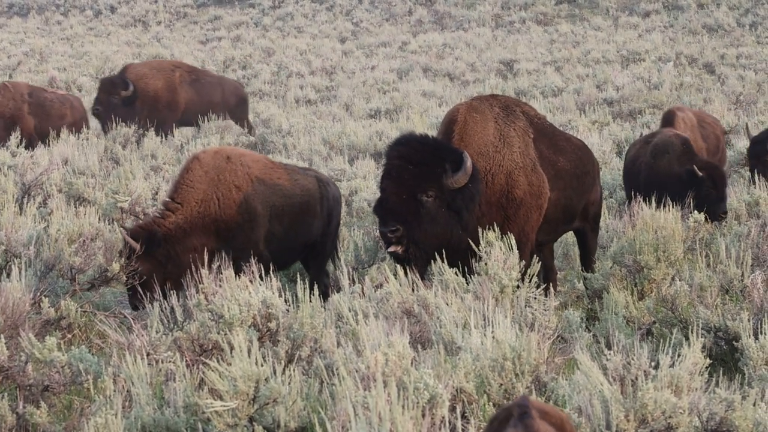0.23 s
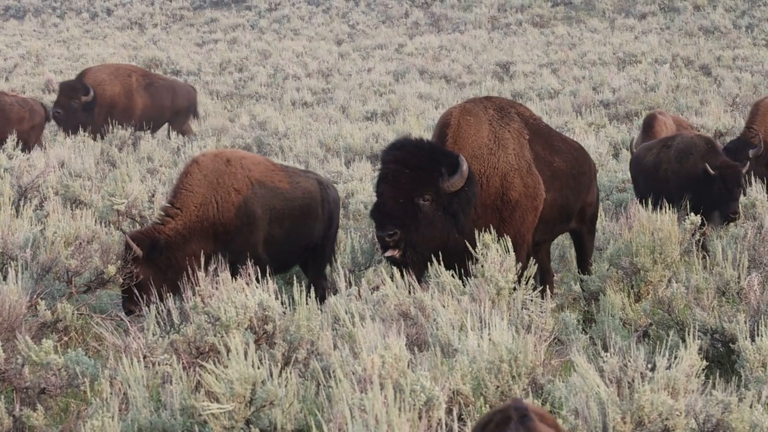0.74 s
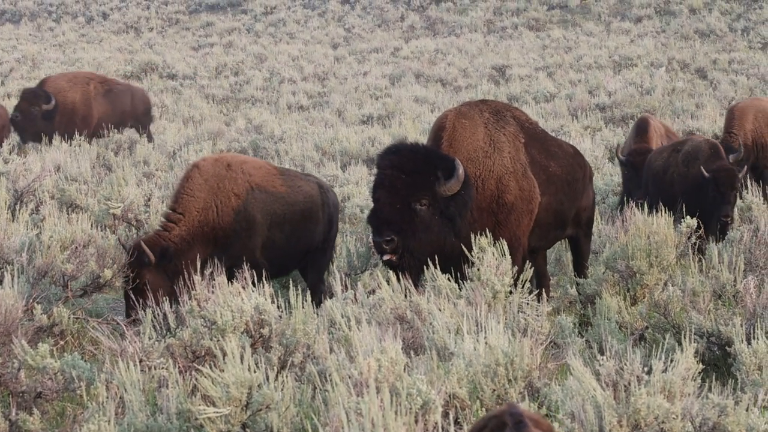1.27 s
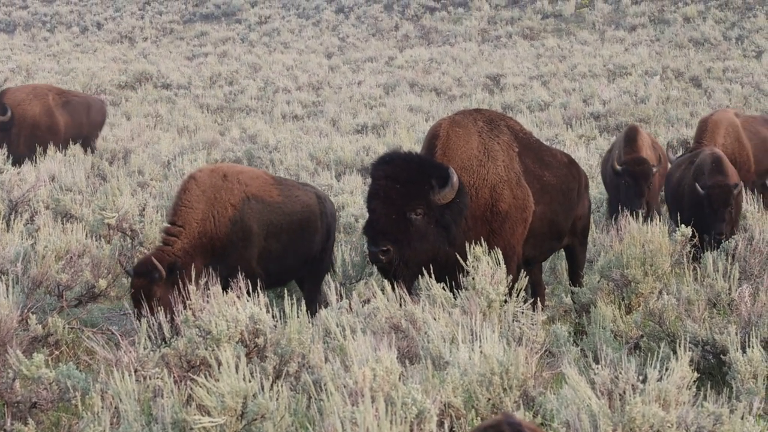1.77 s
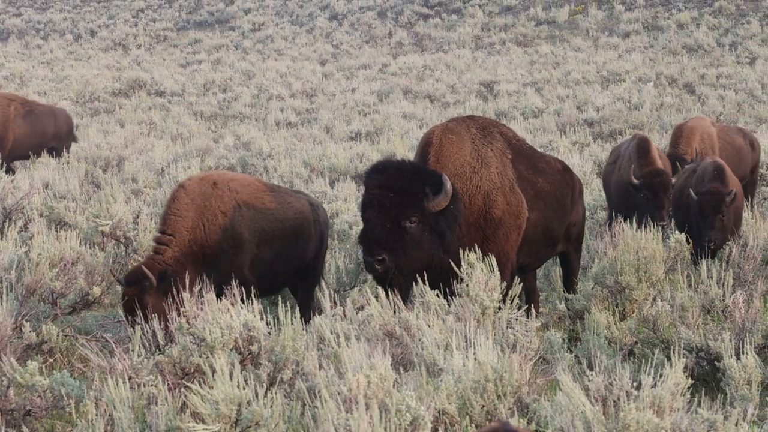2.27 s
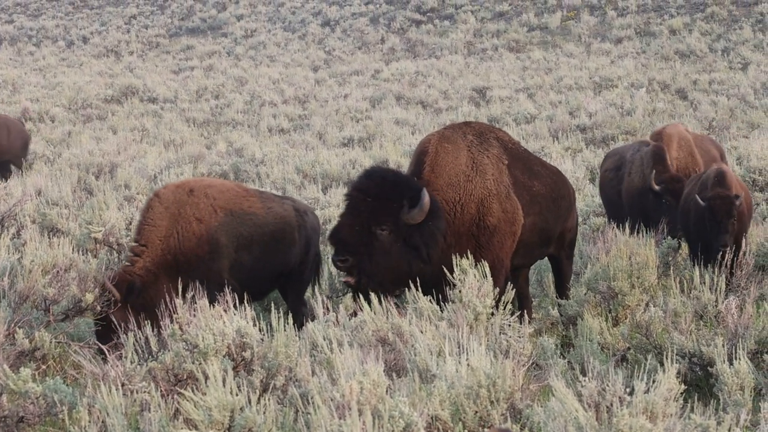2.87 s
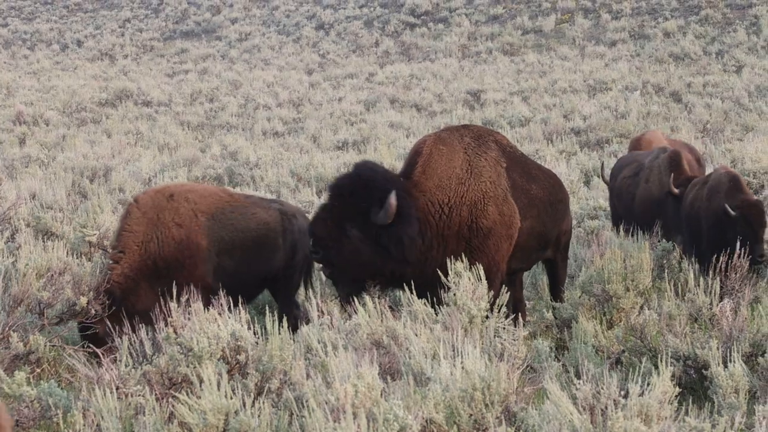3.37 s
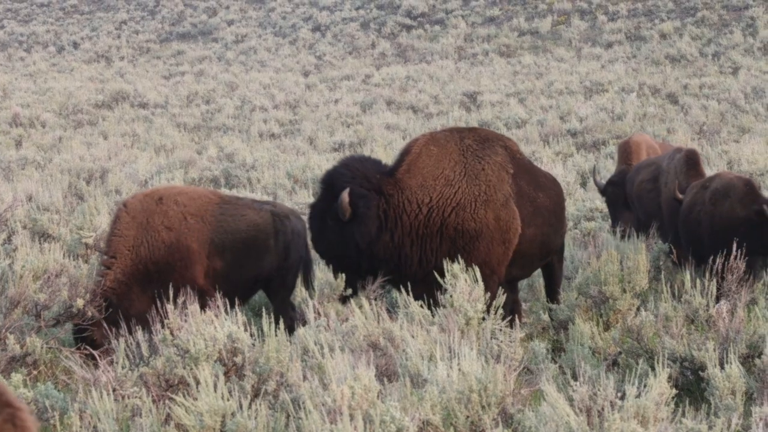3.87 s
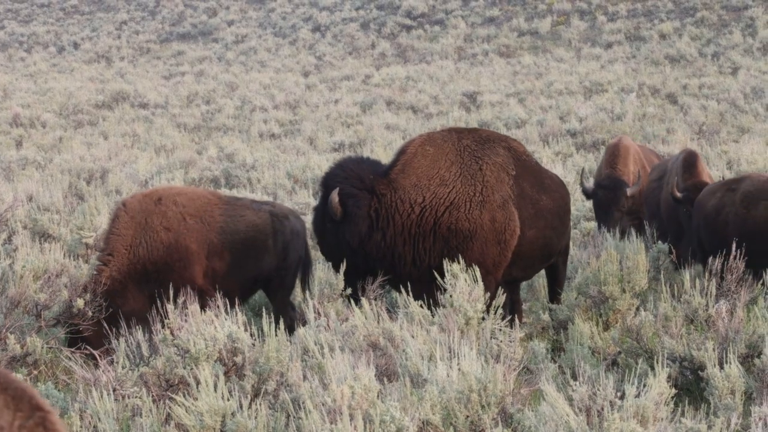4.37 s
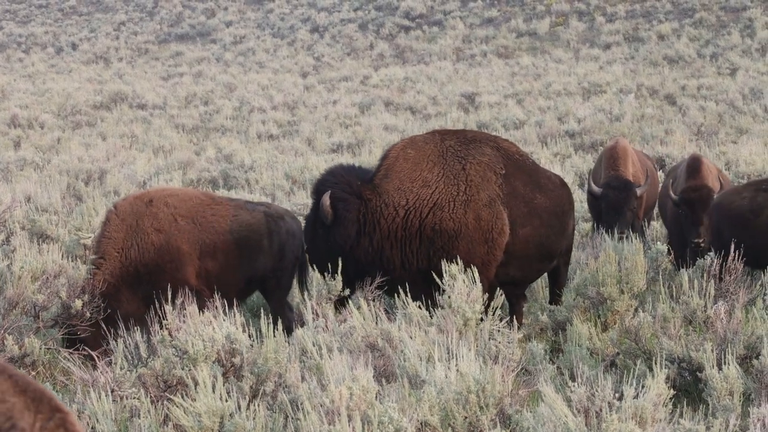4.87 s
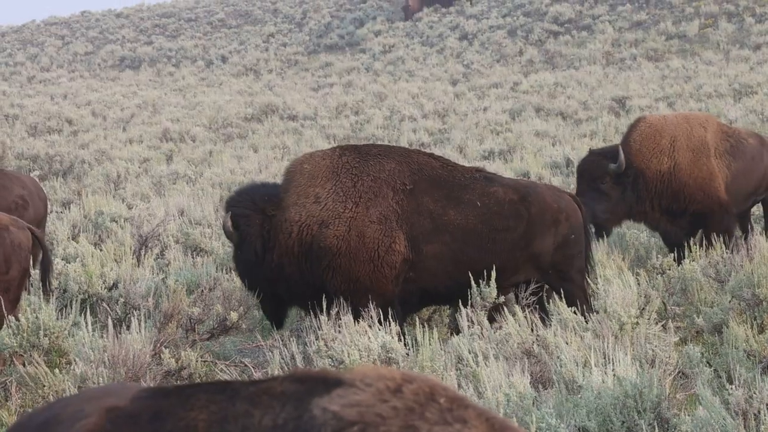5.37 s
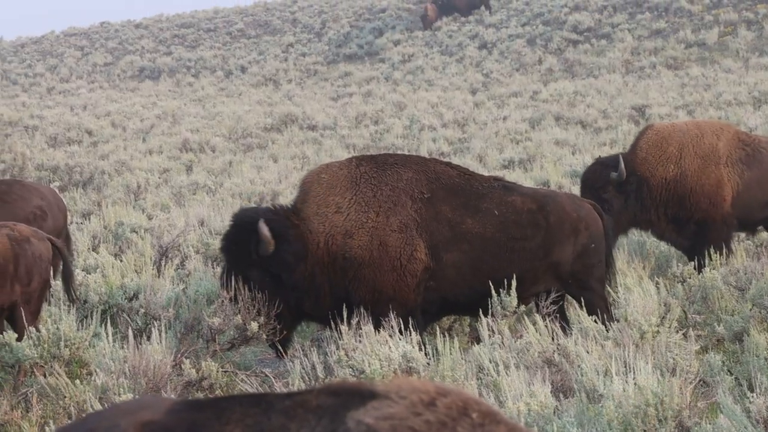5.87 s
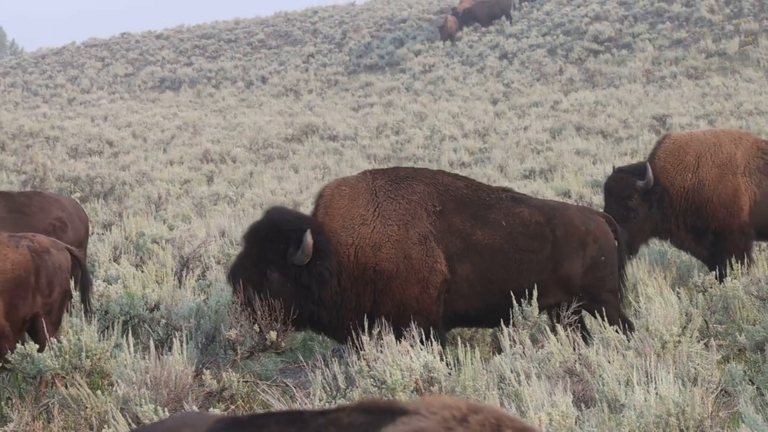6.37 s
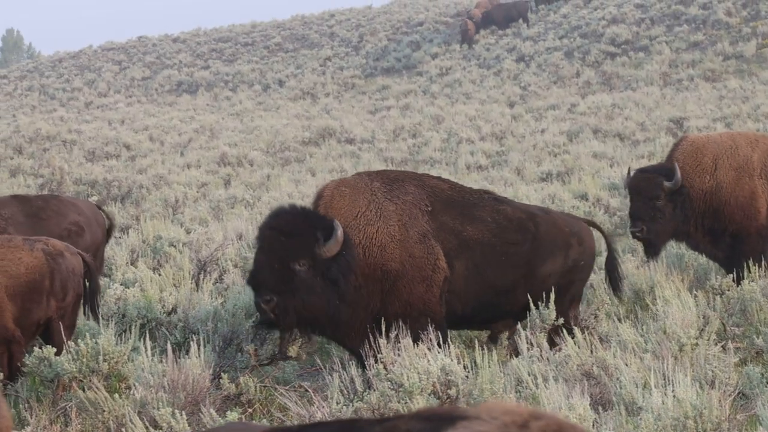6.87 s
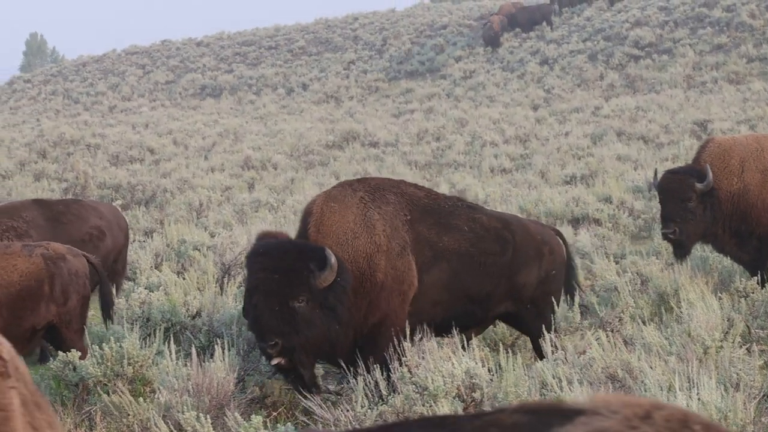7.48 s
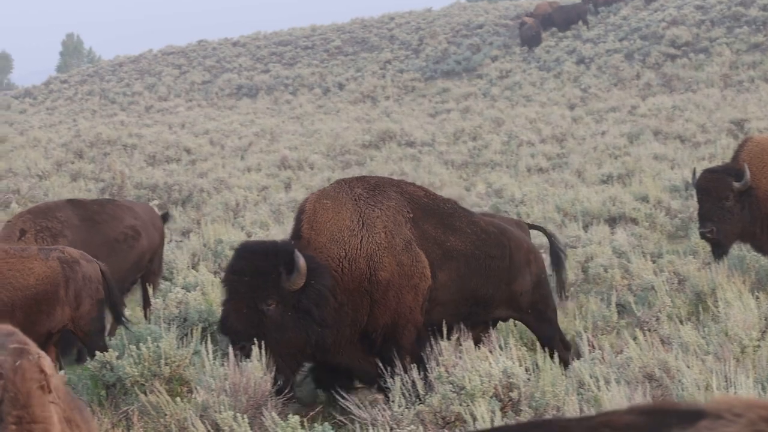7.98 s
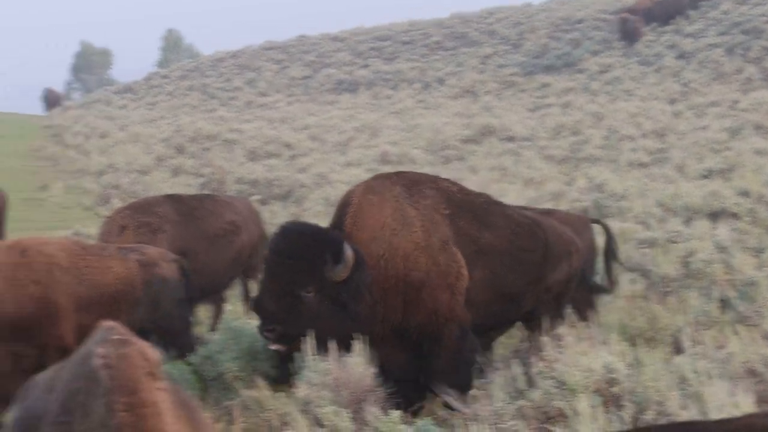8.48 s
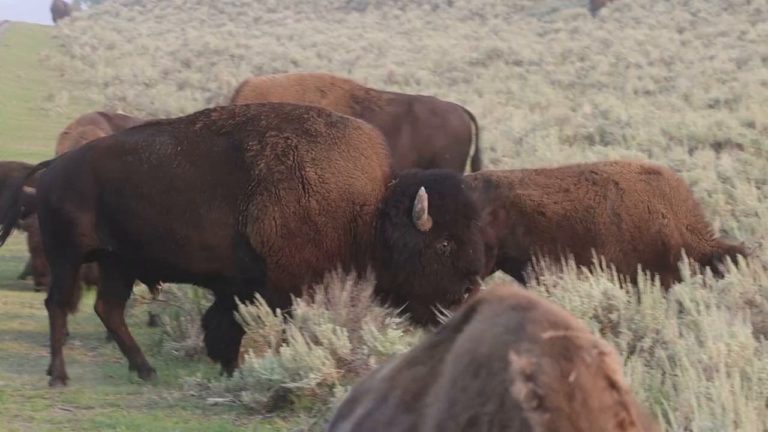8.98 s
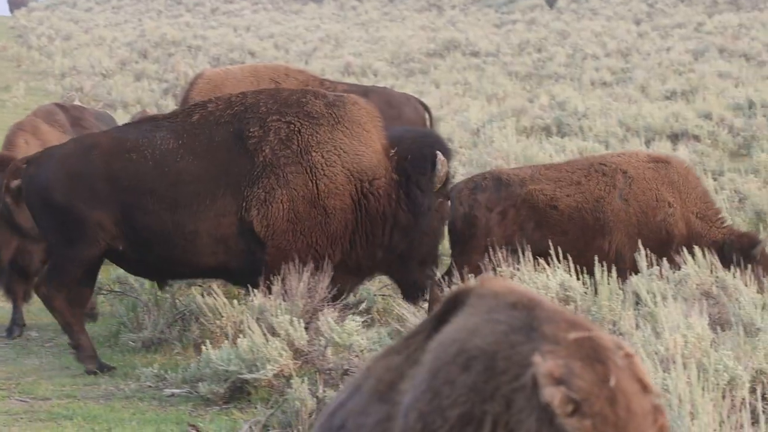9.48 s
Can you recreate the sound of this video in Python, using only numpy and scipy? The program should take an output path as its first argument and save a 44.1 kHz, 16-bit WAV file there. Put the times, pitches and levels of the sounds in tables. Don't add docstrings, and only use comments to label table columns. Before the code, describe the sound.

Bison bulls call in turn: a guttural near growl, a sparse clicking pause, a held deep moan, overlapping grunts and rattles, a raspy croaking grunt, a brief distant hoot, then a powerful sustained rumbling roar ending in snorts and a short grunt. Dry twigs crack and brush rustles lightly. Open-air sound with a slight short scatter off the slope, quiet low wind, and a slightly dull top end.

```python
import sys
import numpy as np
from scipy import signal
from scipy.io import wavfile
from scipy.ndimage import uniform_filter1d

SR = 44100
rng = np.random.default_rng(int(sys.argv[2]) if len(sys.argv) > 2 else 0)


def wav_record(signal):
    frames = np.transpose(np.atleast_2d(signal))
    bounded = np.clip(frames, -1, 1)
    quanta = np.round(bounded * 32767).astype(np.int16)
    wavfile.write(sys.argv[1], SR, quanta)


def volts_from_db(level):
    exponent = np.asarray(level, float) / 20
    return 10 ** exponent


N = 428652


def evened(x, span_s=0):
    power = uniform_filter1d(x ** 2, round(span_s * SR)) if span_s else np.mean(x ** 2)
    return x / np.sqrt(abs(power) + 1e-14)


def smooth_twice(x, size):
    return uniform_filter1d(uniform_filter1d(x, size=size), size=size)


def drift(n, per_s):
    return evened(smooth_twice(rng.standard_normal(n), round(SR / per_s)))


def beats(rate_hz, jitter):
    wander = evened(smooth_twice(rng.standard_normal(len(rate_hz)), 400))
    return np.cumsum(rate_hz * np.exp(jitter * wander)) / SR


def add(mix, start_s, sound):
    part = mix[round(start_s * SR):][:len(sound)]
    part += sound[:len(part)]


def peaked(x):
    return x / abs(x).max()


def resonate(x, hz, width_hz):
    turn = np.exp(2j * np.pi * np.cumsum(hz * np.ones(len(x))) / SR)
    r = np.exp(-np.pi * width_hz / SR)
    return 2 * (turn * signal.lfilter([1 - r], [1, -r], x / turn)).real


def resonate_twice(x, hz, first_width_hz, second_width_hz):
    return resonate(resonate(x, hz, first_width_hz), hz, second_width_hz)


def tract(x, modes, opening):
    out = 0
    for k, (hz, width_hz, level_db) in enumerate(modes):
        out = out + (-1) ** k * volts_from_db(level_db) * resonate(x, hz * opening, width_hz)
    return out


def band_air(hz, width_hz, length_s):
    air = resonate_twice(rng.standard_normal(round(length_s * SR)), hz, width_hz, 2 * width_hz)
    return evened(air) * signal.windows.tukey(len(air), .6)


def coloured(colour, patch_db, flicker_db, size):
    frames, hz = 4 * N // size + 5, np.fft.rfftfreq(size, 1 / SR)
    a, b, patches = rng.standard_normal((frames, len(hz), 3)).T
    patches = evened(uniform_filter1d(uniform_filter1d(patches, size=9, axis=0), size=9, axis=1))
    flicker = evened(uniform_filter1d(rng.standard_normal(frames), size=3))
    colour_hz, colour_db = np.transpose(colour)
    level_db = np.interp(np.log(hz + 1), np.log(colour_hz + 1), colour_db)
    z = (a + 1j * b) * volts_from_db(level_db[:, None] + patch_db * patches + flicker_db * flicker)
    return evened(signal.istft(z, nperseg=size, noverlap=size * 3 // 4)[1][:N])


# pitch_hz, density_db
WASH = [(15, -39.5), (25, -21), (166, 1), (236, -2), (270, -4.5), (384, -2.5), (476, -6.5), (754, -8.5),
        (1520, -13.5), (1740, -17), (2910, -23.5), (3160, -25), (16000, -49.5)]


def wash():
    return volts_from_db(-38) * coloured(WASH, patch_db=1.58, flicker_db=1.26, size=1024)


# pitch_hz, level_db
BRUSH_COLOUR = [(2500, -25), (4500, -8), (7000, -3), (10000, -1), (15500, 0), (16500, -30)]
# centre_s, length_s, level_db
STROKES = [(0.107, 0.056, -62), (0.813, 0.027, -58), (2.787, 0.061, -60), (4.327, 0.027, -63),
           (4.9, 0.018, -56), (5.85, 0.069, -62), (6.51, .12, -58.5), (7.214, .05, -61), (7.66, 0.023, -55),
           (8.547, .03, -54), (8.635, 0.036, -61.5), (8.905, 0.054, -59), (9.316, 0.048, -55.5),
           (9.493, 0.026, -51), (9.676, 0.079, -54)]


def brush(herd):
    rustle_db, breath_db, cracks_per_s = -80, -54, 300
    cracks = volts_from_db(2.1 * np.minimum(rng.exponential(1, N), 4)) * (rng.random(N) < cracks_per_s / SR)
    stem_modes = [(4000, 3000, -50), (8300, 4000, 35), (13000, 5500, -27.5)]  # pitch_hz, width_hz, level_db
    cracks = tract(cracks * rng.choice([-1, 1], N), stem_modes, 0.62)
    hiss = coloured(BRUSH_COLOUR, patch_db=1.5, flicker_db=4, size=1024) + .15 * evened(cracks)
    t = np.arange(N) / SR
    strokes = sum(volts_from_db(db) * np.exp(-((t - s) / length_s) ** 2) for s, length_s, db in STROKES)
    breath = volts_from_db(breath_db) * abs(uniform_filter1d(herd ** 2, size=SR // 5)) ** .25
    stirring = np.sqrt(volts_from_db(rustle_db) ** 2 + strokes ** 2)
    return stirring * hiss + breath * resonate(np.roll(hiss, SR), 5500, 5000)


# start_s, peak_db, low_over_peak_db
SNAPS = [(0.078, -37, 7), (0.811, -26, -1), (1.0077, -48, 16), (1.136, -40, 7), (1.181, -41, 8),
         (1.21, -43, 5), (1.321, -43, -3), (1.475, -27, -19), (1.595, -54, 0), (1.744, -39, 7),
         (1.793, -44, 6), (2.024, -56, 4), (2.187, -54, -1), (2.224, -48, 1), (3.36, -42, 6),
         (2.282, -19, -29), (3.6067, -31, -25), (4.341, -30.5, 4), (4.8932, -39, 15.5), (5.705, -49.5, 17),
         (5.8816, -28, -24), (5.929, -30, -21), (5.9798, -37, -10), (6.465, -30, -6), (7.215, -38, 0),
         (7.643, -32.5, 8), (8.547, -29.5, 2), (8.7162, -66, 10), (8.8373, -52, 1), (8.9531, -35, 0),
         (9.2748, -36, 3), (9.412, -42, 12), (9.46, -38, 12), (9.4696, -32, 21), (9.532, -40, 12)]


def snaps():
    lead_s = .01
    out, t = np.zeros(N), np.arange(2600) / SR - lead_s
    for s, db, low_db in SNAPS:
        envelope = (t > 0) * volts_from_db(-60 * t / 0.0044) + 0.06 * np.exp(-(t / 0.008) ** 2)
        burst = rng.standard_normal(len(t)) * envelope
        high, low = np.diff(burst, prepend=0), resonate(burst, 3500, 2000)
        add(out, s - lead_s, volts_from_db(db) * (0.6 * peaked(high) + volts_from_db(low_db - 0.5) * peaked(low)))
    return out


def slope_echo(herd):
    t = np.arange(SR // 4) / SR
    hits = rng.choice([-1, 1], len(t)) * (rng.random(len(t)) < 1500 / SR)
    slope = hits * volts_from_db(-60 * t / .25) * (t > .004)
    return volts_from_db(-13) * signal.oaconvolve(herd, slope / np.linalg.norm(slope))[:N]


# start_s, length_s, level_db, centre_hz, width_hz
PUFFS = [(1.177, 0.029, -30, 1540, 349.4), (1.207, 0.044, -33.5, 1170, 501), (1.237, 0.028, -44, 950, 350),
         (1.319, 0.0065, -35, 1980, 1500), (1.79, 0.0066, -47, 2900, 900), (3.48, 0.011, -40, 2750, 900),
         (3.547, 0.0096, -41.5, 2600, 1200), (5.701, 0.012, -43, 2180, 1200), (4.52, 0.033, -38, 1400, 700),
         (4.89, 0.0065, -33.5, 2820, 1560), (7.127, 0.091, -49.5, 5200, 1210), (7.22, .03, -48, 4200, 600),
         (7.552, .3, -58, 4850, 900), (8.248, .13, -53, 2980, 900), (2.018, 0.014, -54, 2950, 700),
         (9.464, .03, -43, 5370, 500), (9.471, 0.026, -44, 3500, 500), (3.441, 0.042, -46.5, 3240, 1500),
         (3.52, 0.013, -41.5, 2380, 1500), (3.831, .25, -50, 2100, 300), (8.7, .2, -40, 320, 60),
         (9.034, 0.065, -41, 1460, 1510), (9.454, 0.0069, -30, 863, 900), (9.471, 0.01, -24.5, 630, 600),
         (9.481, 0.027, -34, 1200, 1200), (9.609, 0.032, -42, 2650, 504)]


def puffs():
    out = np.zeros(N)
    for s, length_s, db, hz, width_hz in PUFFS:
        add(out, s, volts_from_db(db) * band_air(hz, width_hz, length_s))
    return out


# start_s, length_s, level_db, first_hz, last_hz, width_hz
SWEEPS = [
    (1.175, 0.088, -39, 1730, 880, 230),
    (2.62, 0.07, -30, 660, 1550, 230),
    (1.18, 0.053, -47, 3800, 2300, 1000),
]


def sweeps():
    out = np.zeros(N)
    for s, length_s, db, first_hz, last_hz, width_hz in SWEEPS:
        hz = np.linspace(first_hz, last_hz, round(length_s * SR))
        add(out, s, volts_from_db(db) * band_air(hz, width_hz, length_s))
    return out


# start_s, peak_db, mouth_hz
CLICKS = [(1.615, -32, 991), (1.647, -27, 1450), (1.667, -24, 1400), (1.7046, -24.5, 1150),
          (1.717, -24, 1450), (1.7529, -22.5, 1470), (1.778, -28, 1490), (1.7963, -23.5, 1270),
          (1.815, -28, 1010), (1.8506, -21.5, 1340), (2.0243, -36, 953), (3.7248, -22, 930),
          (3.765, -23.5, 950), (3.8024, -25, 970), (3.8514, -25, 982), (9.47, -28, 1490),
          (3.484, -25, 1400), (3.677, -30, 1010), (3.745, -22, 900), (3.785, -25, 940), (4.985, -21.5, 900),
          (5.074, -20, 980), (5.165, -30, 2200), (5.19, -21, 2160), (5.216, -27, 2200), (5.245, -23, 2100),
          (5.33, -28, 2270), (5.026, -25, 902), (5.0495, -22, 945), (5.1472, -22, 1310),
          (5.1924, -24, 1220), (5.2778, -23, 1210), (5.39, -32, 1320), (5.5704, -39, 1375),
          (6.2806, -22, 980), (6.396, -26, 1280)]


def clicks():
    out, click = np.zeros(N), signal.unit_impulse(2000)
    knock = peaked(resonate(click, 285, 70))
    for s, db, hz in CLICKS:
        ring = resonate(click, hz, 185) - 0.19 * resonate(click, 1.22 * hz, 880)
        add(out, s, volts_from_db(db) * (peaked(ring) + 0.23 * knock))
    return out


# time_s, pitch_factor
JAW = [(0, 1), (2.3, 1), (2.55, .86), (2.72, 1.02), (2.95, 1), (7.66, 0.99), (7.8, 1.12), (8.05, 1.08),
       (8.2, 1.02), (8.55, 1.05), (8.7, 1.03), (8.9, 0.99)]


def jaw_factor(t):
    return np.interp(t, *np.transpose(JAW))


# start_s, peak_db
SLAPS = [(0.031, -14.5), (0.054, -16), (0.077, -17), (0.1, -16), (0.124, -18), (0.161, -13), (0.272, -16),
         (0.384, -20), (0.406, -17), (0.453, -16.5), (0.476, -11.5), (0.55, -18), (0.573, -14),
         (0.668, -16), (0.692, -14), (0.714, -17), (0.753, -18), (0.83, -15), (0.881, -12.5), (0.925, -15),
         (0.97, -11.5), (0.995, -9.5), (1.018, -12), (1.106, -12.5), (1.881, -14.5), (1.926, -21.5),
         (2.634, -16), (3.523, -12.5), (3.544, -13), (3.568, -20), (3.611, -17), (3.628, -14), (7.127, -21),
         (7.184, -13.5), (7.219, -7), (7.539, -15), (7.605, -15), (7.628, -19), (7.652, -18), (7.674, -19),
         (7.722, -16), (7.747, -15), (7.769, -19), (7.796, -15), (7.82, -14), (7.845, -16.5), (7.87, -11.5),
         (7.924, -12), (7.944, -19), (7.968, -11), (7.994, -16), (8.017, -17), (8.041, -17), (8.165, -18),
         (8.275, -15), (8.33, -17), (8.638, -11), (8.809, -15)]
# pitch_hz, width_hz, level_db
NEAR_MOUTH = [(475, 14, -1), (650, 28, 0), (955, 60, -2), (1215, 65, -3), (1510, 135, -9.5)]


def slaps():
    out, click = np.zeros(N), signal.unit_impulse(2500)
    knock = peaked(resonate_twice(click, 215, 60, 120))
    damped = [(hz, 1.6 * width_hz, db) for hz, width_hz, db in NEAR_MOUTH]
    for s, db in SLAPS:
        lift = jaw_factor(s) * rng.uniform(.98, 1.03)
        ring = resonate(tract(click, damped, lift), 1150, 1300)
        add(out, s, volts_from_db(min(db, -8) - 1) * (peaked(ring) + .3 * knock))
    return out


FOLDS = {"growl": (2.5, .33, 6, .48), "rattle": (6.5, .2, 0, 0), "moan": (2, .4, 2.5, .76),
         "held": (1, .24, 5, .88), "grunt": (3.4, .4, 0, .05), "rasp": (5.2, .72, 0, .1),
         "hoot": (2.6, .4, 0, .7), "roar": (2.5, .48, 5, .6), "torn": (2.5, .46, 5, .42),
         "hum": (3, .5, 2, .68)}
# start_s, way, rasp_db
CHANGES = [(0, "growl", 1.5), (.9, "growl", 5), (1.4, "rattle", -12), (2.3, "moan", -6),
           (2.96, "held", 0.5), (3.42, "torn", 3.5), (3.75, "grunt", 11), (4.48, "moan", 14),
           (4.85, "rasp", 14), (6, "hoot", 7), (7, "roar", 0), (7.38, "torn", 2), (7.6, "torn", 3.5),
           (7.9, "torn", 0.5), (8.07, "hum", 5.5), (8.87, "rattle", 6.5), (9.3, "growl", 11.5)]


def folds(t):
    glide_s = .03
    ways = np.array([(*FOLDS[way], rasp_db) for _, way, rasp_db in CHANGES])
    now = np.searchsorted([s for s, *_ in CHANGES], t, side="right") - 1
    return uniform_filter1d(ways[now], size=round(glide_s * SR), axis=0, mode="nearest").T


# time_s, pitch_hz
TONGUE = [(0, 673), (.22, 656), (.3, 742), (.55, 736), (.75, 627), (1.05, 660), (1.16, 750), (3.4, 620),
          (3.72, 740), (7.1, 710), (7.35, 697), (7.45, 600), (7.6, 600), (7.8, 657), (8.1, 630), (8.2, 677),
          (8.55, 678), (8.66, 617), (8.8, 684.6)]
# lowest_hz, highest_hz
TONGUE_RANGE = (620, 670)


def moving_mouth(modes, t):
    wobble_share, flutter_db, jaw_above_hz = .01, 1.5, 800
    tongue_hz, jaw = np.interp(t, *np.transpose(TONGUE)), jaw_factor(t)
    moved = []
    for hz, width_hz, db in modes:
        if TONGUE_RANGE[0] < hz < TONGUE_RANGE[1]:
            pitch_hz = tongue_hz
        else:
            pitch_hz = hz * (jaw if hz > jaw_above_hz else 1) * (1 + wobble_share * drift(len(t), 8.1))
        moved.append((pitch_hz, width_hz, db + flutter_db * drift(len(t), 25)))
    return moved


def bellow(rows, mouth, rasp, chest_width_hz, growl_db, growl_hz):
    s, *columns = np.transpose(rows)
    t = np.arange(s[0], s[-1], 1 / SR)
    chest_db, chest_hz, mouth_db = (np.interp(t, s, c) for c in columns)
    cycles, rough, weak_db, sung, rasp_db = folds(t)
    turns = beats(chest_hz / cycles, .3 * rough ** 2)
    beat = turns.astype(int)
    size = volts_from_db(2.8 * rough * rng.standard_normal(400)[beat] - weak_db * (beat % 2))
    pulses = size * (np.diff(beat, prepend=0) > 0)
    air_puffs = evened(size * (.25 + np.exp(-(turns % 1) / .35)) * rng.standard_normal(len(t)))
    drive = evened(pulses) + air_puffs * 1.3 * rough

    tone = evened(resonate_twice(drive, chest_hz, chest_width_hz, 60), .06)
    tone = (1 - sung) * tone + sung * 1.6 * np.sin(2 * np.pi * beats(chest_hz, .04 * rough))

    flap = np.diff(beats(44 + 0 * t, .18).astype(int), prepend=0) > 0
    flaps = evened(flap * rng.uniform(.5, 1, len(t)))
    growl = evened(resonate_twice(flaps + .5 * drive, growl_hz, 60, 150), .1)
    rumble = evened(resonate_twice(flaps + drive, 118.4, 30, 35), 0.21)
    growl = growl + volts_from_db(-27 - growl_db) * rumble

    upper = resonate(tract(drive + .6 * rough * flaps, moving_mouth(mouth, t), 1), 1053, 960)
    patchy = [(hz, .6 * width_hz, db + 1.8 * drift(len(t), 12)) for hz, width_hz, db in rasp]
    air = resonate(tract(.5 * drive + air_puffs, patchy, 1), 3500, 7000)
    upper = evened(upper, 0.074) + evened(air, 0.39) * volts_from_db(rasp[0][2] + 2.5 + rasp_db)
    voice = evened(tone + volts_from_db(growl_db) * growl, 0.11) + volts_from_db(mouth_db) * upper
    return s[0], volts_from_db(chest_db) * voice * signal.windows.tukey(len(t), 0.0049 / (s[-1] - s[0]))


PITCH_SHAPE = [.95, 1.04, .93, 0.95]


def grunt(start_s, length_s, chest_db, chest_hz, mouth_db):
    rise_s, fall_s, edge_db, sag_db = 0.066, 0.0715, -15, -1
    s = start_s + np.array([0, rise_s, length_s - fall_s, length_s])
    level_db = chest_db + edge_db * np.array([1, 0, 0, 1]) + sag_db * (s > start_s + rise_s)
    return np.transpose([s, level_db, chest_hz * np.array(PITCH_SHAPE), mouth_db + 0 * s])


# pitch_hz, width_hz, level_db
CLEAR_MOUTH = [(586, 45, -3), (670, 90, -8), (965, 80, 1), (1200, 70, 0), (1398, 110, 0)]
THIRD_MOUTH = [(455, 16, 5), (647.5, 60, 2.5), (953, 54, 0), (1200, 110, -1), (1647, 270, -9)]
FAR_MOUTH = [(440, 23, -7), (944, 61, 6.5), (1220, 66, 2), (1536, 78, 2.5)]
SECOND_MOUTH = [(426, 68, 13), (1030, 160, 2.5), (1280, 190, 3), (2220, 310, 2.5), (2600, 140, -2)]
# pitch_hz, width_hz, level_over_mouth_db
NEAR_RASP = [(2350, 500, -27), (3000, 500, -27), (3900, 700, -31), (5400, 600, -36), (6600, 250, -31)]
CLEAR_RASP = [(2090, 600, -23.5), (3220, 340, -21), (4480, 1800, -27.5), (5600, 260, -41)]
THIRD_RASP = [(1830, 990, -19.5), (2640, 1900, -22.5), (4470, 4100, -30.5), (6300, 2800, -45.5)]
FAR_RASP = [(2064, 290, -21), (2530, 800, -26), (4040, 2200, -36)]
SECOND_RASP = [(3260, 1200, -48.5), (5900, 2200, -30)]
# time_s, chest_db, chest_hz, mouth_over_chest_db
NEAR_BELLOW = [(0.0, -24.5, 227, -2), (0.122, -18.5, 213, -13), (0.19, -23, 224.3, -4),
               (0.328, -20.5, 210.8, -15.5), (0.368, -24.5, 212.1, -15), (0.486, -18.5, 214.9, -18),
               (0.52, -25.5, 217.2, -15.5), (0.614, -30, 214.7, -1.5), (0.63, -27, 217.4, -9)]
NEAR_ENDING = [(0.62, -27, 212.2, -9), (0.71, -23.5, 218.8, -7.5), (0.786, -28, 227.8, -3.5),
               (0.85, -19.5, 208.7, -11), (0.88, -29, 217.9, 0), (0.908, -20, 227.9, -11),
               (1.048, -23, 226.4, -4.5), (1.136, -20, 213.2, -13.5), (1.22, -43.5, 221.5, 6.5)]
CLEAR_BELLOW = [(2.51, -35.5, 160, -19), (2.58, -28.5, 189, -6), (2.65, -14, 215.7, -17.5),
                (2.71, -23, 241.5, -6), (2.78, -15, 231.4, -10.5), (3.11, -18, 237.3, -10.5),
                (3.23, -18.5, 233.3, -11), (3.33, -19.5, 233.3, -10), (3.45, -23, 200.8, -9)]
THIRD_OPENING = [(7.118, -21, 209.5, -12), (7.15, -23.5, 205.7, -9), (7.21, -11, 216.5, -17),
                 (7.224, -16, 215.4, -2.5), (7.268, -12.5, 210.5, -19.5), (7.402, -18, 211.7, -13),
                 (7.584, -22, 225.7, -4.5), (7.64, -26.5, 196, -6.5), (7.655, -20, 195.2, -5)]
THIRD_BELLOW = [(7.645, -24.5, 197.9, -7), (7.687, -13.5, 209.6, -14.5), (7.805, -18.5, 212.1, -11.5),
                (7.869, -25.5, 227.5, -4), (7.931, -15.5, 213.9, -12), (7.989, -20.5, 225.1, -8.5),
                (8.173, -14, 223.9, -18.5), (8.247, -18.5, 206, -12.5), (8.27, -18, 210, -20)]
THIRD_ENDING = [(8.26, -24, 213.5, -12), (8.304, -20, 231.4, -11.5), (8.414, -15, 218.8, -17.5),
                (8.494, -20, 217.7, -17.5), (8.55, -13.5, 215.7, -19), (8.634, -22, 235.5, -10),
                (8.706, -14, 225.4, -14), (8.856, -15.5, 225.7, -17.5), (8.957, -23.5, 211.1, -19)]
FAR_RATTLE = [(3.7, -26, 166.1, -19), (3.98, -24, 177.3, -16), (4.16, -28.5, 157.2, -13.5),
              (4.38, -30, 156.1, -11), (4.43, -25, 217.3, -16.5), (4.66, -31, 187.7, -25),
              (4.78, -44, 167.2, -23)]
FAR_HOOT = [(6.2, -53, 190.2, -10), (6.26, -36.5, 185.8, -10), (6.36, -32.5, 164.9, -8),
            (6.45, -36.5, 140.1, -7), (6.51, -51, 124, -7)]
SECOND_GRUNT = [(4.962, -34, 209, -30), (4.972, -22, 206.2, -16), (5.03, -27.5, 225.4, -5),
                (5.25, -25.5, 230, -5), (5.39, -27, 233, -10), (5.49, -31, 227.5, -17.5),
                (5.68, -37, 222.2, -17), (5.76, -55, 215, -11)]
# start_s, length_s, chest_db, chest_hz, mouth_over_chest_db
NEAR_GRUNTS = [(3.37, .39, -23, 207, -7.5)]
THIRD_GRUNTS = [(9.589, 0.24, -29.5, 197.3, -9.5)]
FAR_GRUNTS = [(1.6, .4, -39.5, 236, -7.5)]


def bulls():
    herd = slaps() + puffs() + clicks() + sweeps()
    near = [NEAR_BELLOW, NEAR_ENDING] + [grunt(*g) for g in NEAR_GRUNTS]
    third = [THIRD_OPENING, THIRD_BELLOW, THIRD_ENDING] + [grunt(*g) for g in THIRD_GRUNTS]
    far = [FAR_RATTLE, FAR_HOOT] + [grunt(*g) for g in FAR_GRUNTS]
    # calls, mouth, rasp, chest_width_hz, growl_db, growl_hz
    voices = [(near, NEAR_MOUTH, NEAR_RASP, 28, -9, 172),
              ([CLEAR_BELLOW], CLEAR_MOUTH, CLEAR_RASP, 22, -10, 162),
              (third, THIRD_MOUTH, THIRD_RASP, 28, -9.5, 168),
              (far, FAR_MOUTH, FAR_RASP, 45, -4, 140),
              ([SECOND_GRUNT], SECOND_MOUTH, SECOND_RASP, 90, -5, 175)]
    for calls, *throat in voices:
        for rows in calls:
            add(herd, *bellow(rows, *throat))
    return signal.sosfilt(signal.butter(3, [60, 7500], "band", fs=SR, output="sos"), herd)


def scene():
    herd = bulls()
    return (wash() + brush(herd) + snaps() + slope_echo(herd) + herd)[None]


def low_pass(x):
    return signal.sosfilt(signal.butter(12, 16920, fs=SR, output="sos"), x)


# start_s, equal_s, end_s, delay_s
TWIN = (3.6, 4.19, 4.9, 0.002)
# pitch_hz, width_hz
DIPS = [(6955, 300), (13900, 400)]
# start_s, length_s, cut_hz
DROPS = [(.18, .016, 6000), (1.894, .022, 5500), (1.99, .02, 6500), (2.108, .016, 6000),
         (2.155, .016, 3500), (3.64, .02, 4500), (2.78, .016, 8000), (3.385, .02, 5000), (4.76, .02, 4000),
         (4.83, .016, 5000), (5.485, .03, 4500), (6.99, .016, 6000), (8.47, .026, 5500), (8.68, .04, 4600),
         (8.795, .04, 4300), (8.96, .02, 6500), (9.7, .018, 6500)]


def record(dry):
    start_s, equal_s, end_s, delay_s = TWIN
    share = np.interp(np.arange(N) / SR, [start_s, equal_s, end_s], [0, .5, 0])
    x = (1 - share) * dry + share * np.roll(dry, round(delay_s * SR), axis=1)
    for hz, width_hz in DIPS:
        x = signal.lfilter(*signal.iirnotch(hz, hz / width_hz, SR), x)
    x = .7 * np.tanh(x / .7)
    for s, length_s, cut_hz in DROPS:
        part = slice(round(s * SR), round((s + length_s) * SR))
        treble = signal.sosfiltfilt(signal.butter(6, cut_hz, "high", fs=SR, output="sos"), x[:, part])
        x[:, part] -= treble * signal.windows.tukey(treble.shape[1], .4)
    band_limit = signal.firwin(511, 15900, window=("kaiser", 9), fs=SR)
    return low_pass(signal.oaconvolve(x, band_limit[None], "same"))


dry = scene()
out = record(dry)
wav_record(out)
```